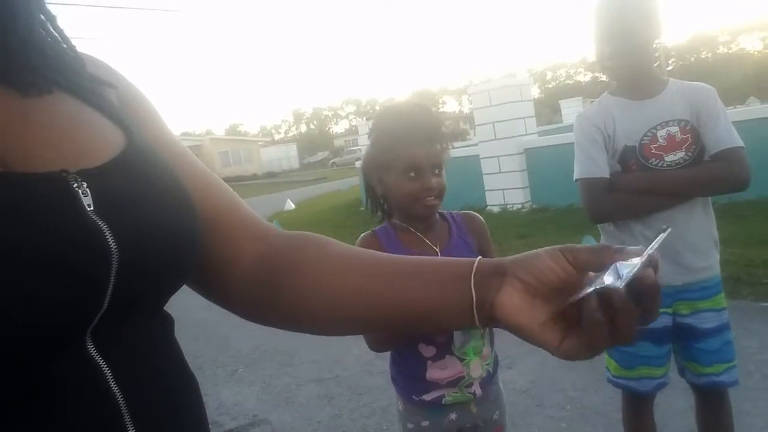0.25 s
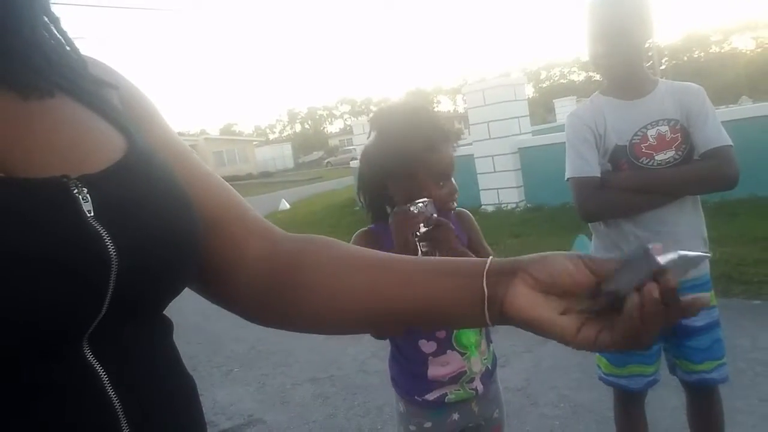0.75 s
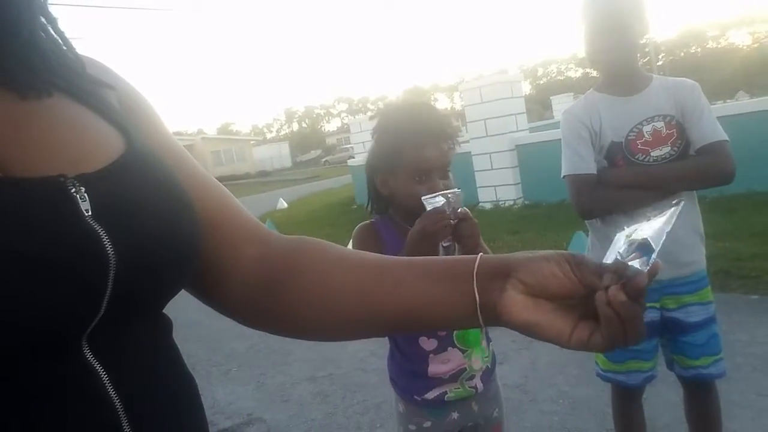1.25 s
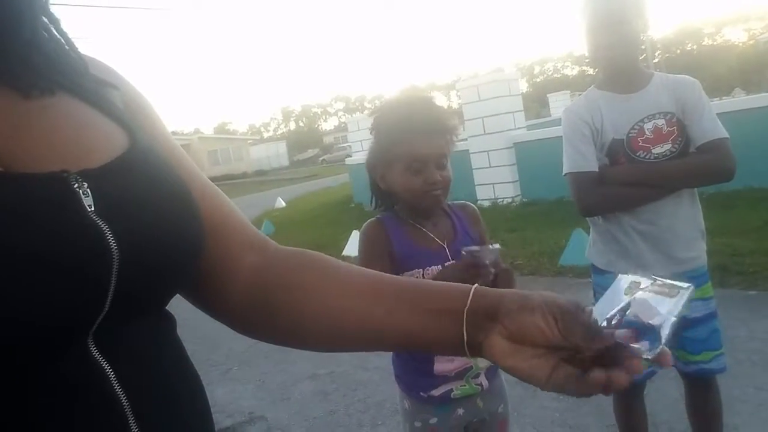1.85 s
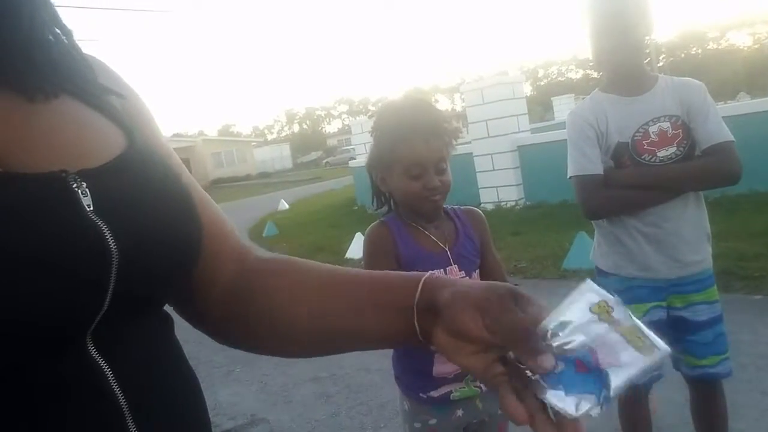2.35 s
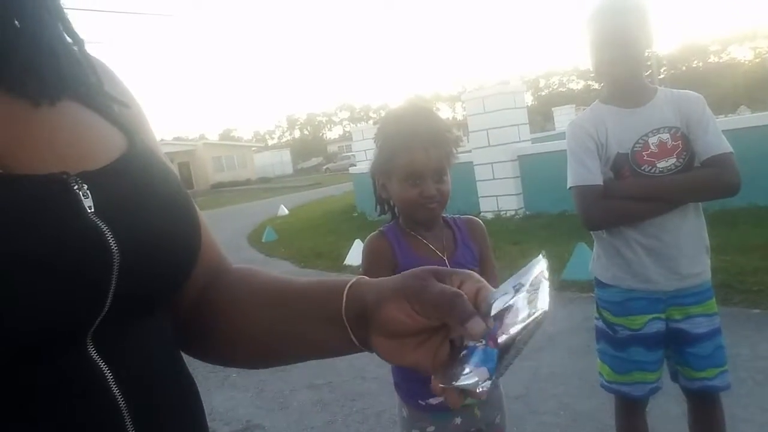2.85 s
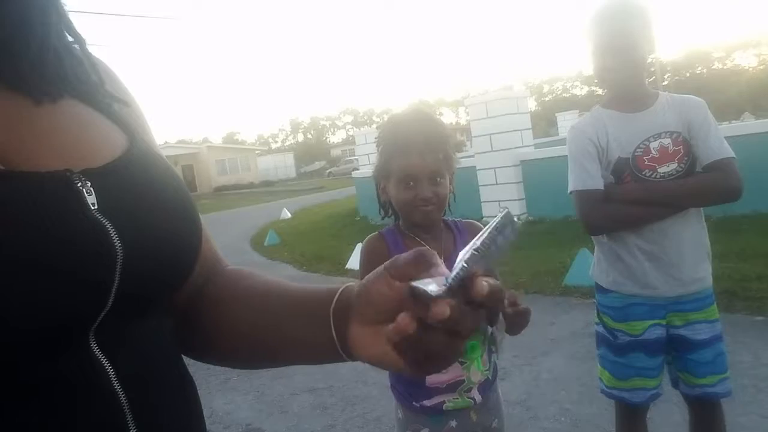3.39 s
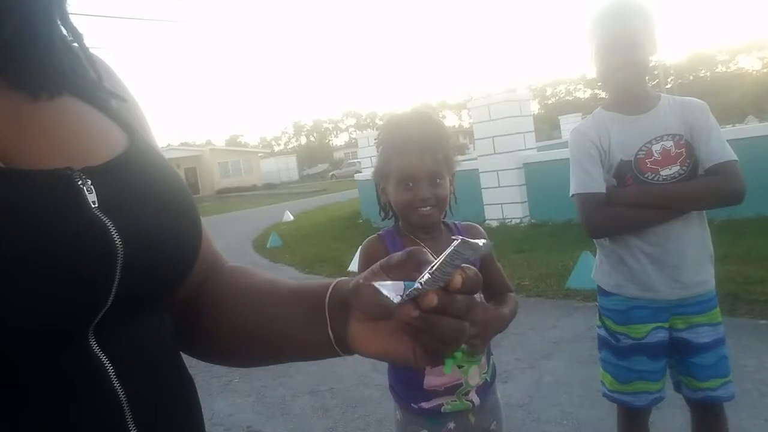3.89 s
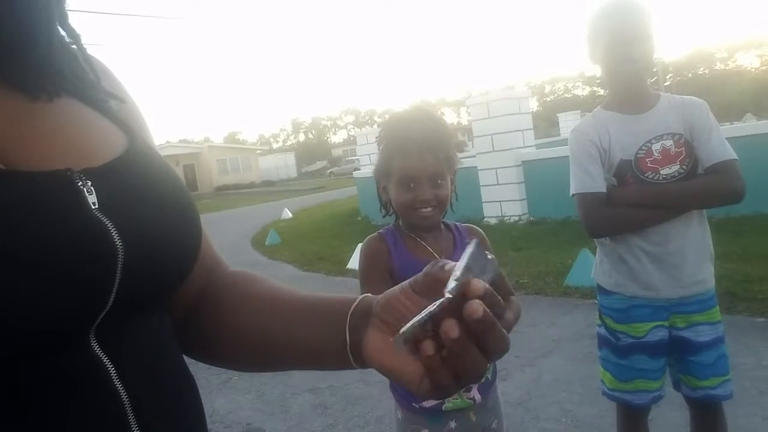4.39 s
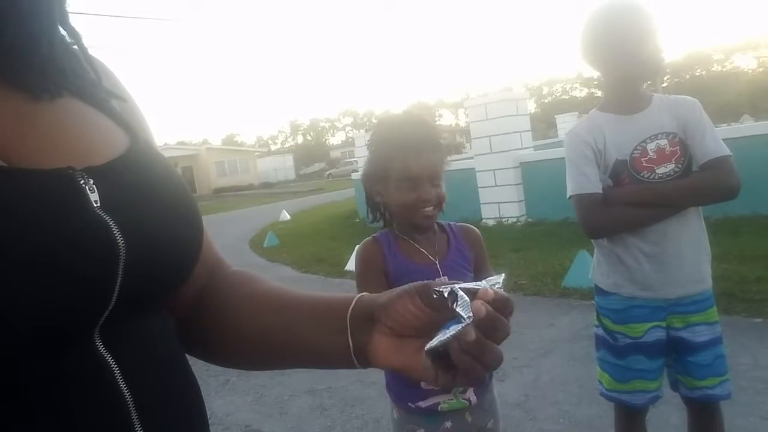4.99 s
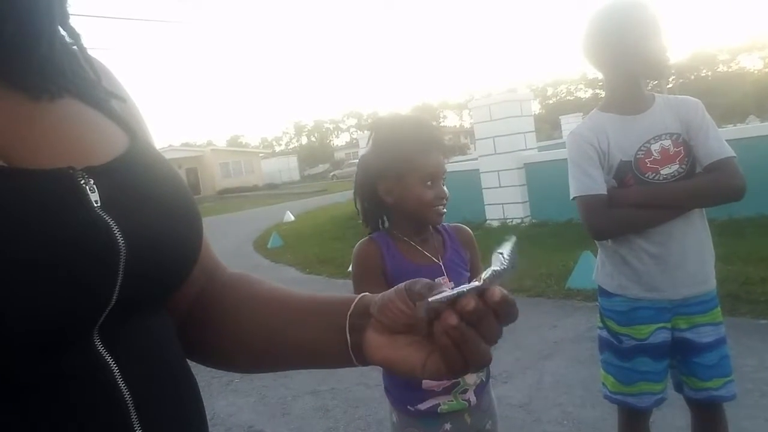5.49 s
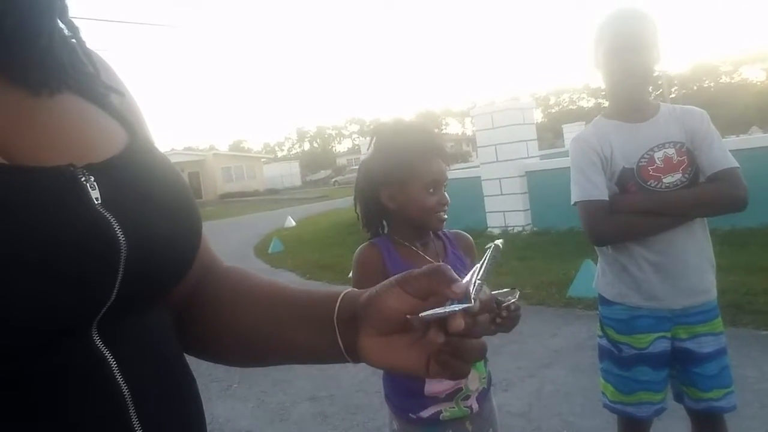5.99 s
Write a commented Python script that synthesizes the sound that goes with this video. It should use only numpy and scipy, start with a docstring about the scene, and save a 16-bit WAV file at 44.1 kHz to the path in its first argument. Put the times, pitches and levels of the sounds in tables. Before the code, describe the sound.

Small foil packets crinkle in a hand close to the microphone, slightly to the right, for about six seconds. Sharp, bright snaps come in irregular clusters, with fine rustling between them and occasional light knocks as the packet jerks. The crinkling starts lightly, grows dense and loud from about 0.4 to 1.3 seconds, then continues in shorter bursts until 2.8. It thins to soft ticks until about 3.6, then returns in busy runs around 4, 5 and 5.7 seconds, with one of the sharpest cracks near 5.8, and carries on to the end. Behind it is a quiet street with a low, distant traffic rumble and slight hiss. Two very faint, brief hoots sound far off at about 1.9 and 2.4 seconds. A barely audible engine hums from about 2.6 to 5 seconds, rising in pitch near its end.

```python
"""Sharp crinkling of small foil packets, squeezed in a hand just right of a phone on a quiet street.
Each buckling crease rings a few facets of foil, cracks in the treble and sets off its neighbours.
The packet thuds as it jerks, and countless small creases rustle between the snaps.
Behind it are distant traffic rumble, a far engine's hum, two faint hoots and microphone hiss.
The phone's body shades its left port."""
import sys
import numpy as np
from scipy import signal
from scipy.fft import rfft, irfft, next_fast_len
from scipy.io import wavfile
from scipy.ndimage import uniform_filter1d

SR = 44100
rng = np.random.default_rng(int(sys.argv[2]) if len(sys.argv) > 2 else 0)


def wrap_up_sound(samples):
    """Save the sound to the file named by the first command line argument, as 16-bit audio."""
    columns = np.atleast_2d(samples).T
    # keep every value between -1 and 1, then stretch to whole-number steps
    tamed = np.clip(columns, -1, 1)
    steps = np.round(tamed * 32767).astype(np.int16)
    wavfile.write(sys.argv[1], SR, steps)


N = 275184
GRAIN_SAMPLES = 320

# Each row: time in seconds, ring level in dB at the right port, facet pitch in Hz, crack in dB re ring.
SNAP_EVENTS = [(0.0059, -30, 1960, 8), (0.071, -20.5, 2020, -4), (0.08, -20, 2130, 4.5),
               (0.0988, -18.5, 4120, -22), (0.1224, -20, 1940, -7), (0.1301, -24.5, 2520, 5),
               (0.1353, -25, 2750, -2), (0.181, -22, 2330, 1), (0.1933, -17, 2260, -2),
               (0.2093, -18.5, 5100, 0.5), (0.265, -19, 2820, -15), (0.285, -27, 3900, -1),
               (0.334, -29, 2400, -6.5), (0.3513, -22, 3450, -16), (0.3649, -4.5, 2850, -6.5),
               (0.3686, -14, 2410, -11), (0.379, -16, 3350, -9), (0.3841, -7.5, 4130, -25),
               (0.389, -23, 2200, -10), (0.4057, -17.5, 1900, -11), (0.4091, -23, 2020, -6),
               (0.4298, -17, 1730, -12), (0.4595, -17, 1960, -17), (0.478, -24, 2500, -4),
               (0.5006, -17, 1950, -23), (0.507, -14, 1450, -1), (0.514, -6, 4360, -16),
               (0.5231, -12.5, 2040, 3.5), (0.533, -4.5, 2350, -19), (0.558, -27, 2500, 2),
               (0.563, -7, 2800, -14), (0.5667, -4.5, 2300, -7.5), (0.5755, -14, 1990, -23),
               (0.6146, -22.5, 2200, 4), (0.621, -15.5, 3720, -8), (0.6283, -16, 2120, -13),
               (0.634, -15, 3000, -16), (0.643, -18, 3140, -26), (0.6457, -15, 2930, 3),
               (0.6546, -20, 2970, 5), (0.666, -7, 3650, -9), (0.6873, -10.5, 2230, -5.5),
               (0.691, -16, 1790, -11), (0.6923, -19, 2600, -2), (0.7147, -17, 2330, -27),
               (0.7192, -18, 2110, 4), (0.723, -16, 3500, 0), (0.724, -13, 2970, -2),
               (0.7523, -5.5, 2340, -9.5), (0.757, -9.5, 2170, -14), (0.7765, -8, 2250, -16),
               (0.78, -0.5, 2830, -10.5), (0.7953, -12.5, 3070, -12), (0.813, -22, 2070, -3),
               (0.8305, -11, 3040, -6), (0.8366, -10.5, 2080, -4.5), (0.848, -17, 2980, 0),
               (0.857, -12, 3060, 2), (0.8738, -8.5, 1950, -3.5), (0.878, -24, 2040, 9),
               (0.8976, -11, 2140, -9), (0.901, -18, 2330, -21), (0.9279, -23.5, 2470, -2),
               (0.9755, -13.5, 2120, -4), (0.98, -16.5, 2100, -4), (1.0352, -18, 4440, -19),
               (1.047, -20, 2790, -7), (1.0614, -12, 2300, -5), (1.0776, -12, 4400, -8),
               (1.085, -16, 2200, -8), (1.0922, -19, 2430, -4), (1.0956, -19.5, 2200, -1),
               (1.1337, -7.5, 3460, -7), (1.1393, -10, 2680, -17), (1.1937, -22, 2690, -14),
               (1.199, -15.5, 2770, -19), (1.203, -22, 2640, -15), (1.2266, -18.5, 2280, 0),
               (1.235, -12, 3140, -27), (1.25, -15.5, 4280, -0.5), (1.2546, -10, 2260, -7.5),
               (1.2593, -13, 2280, -17), (1.2638, -16, 3580, -20), (1.2703, -22, 2930, -22),
               (1.2745, -9, 3000, -18), (1.29, -10.5, 1500, 0), (1.3207, -14.5, 2150, -14),
               (1.326, -12.5, 2920, -21), (1.3642, -22.5, 3150, -33), (1.403, -21.5, 2650, -16),
               (1.41, -25, 2480, -37), (1.4462, -19, 2810, -12.5), (1.501, -35, 2750, 6),
               (1.5128, -21.5, 2010, -5), (1.548, -21, 3400, -7), (1.553, -15, 3070, -20),
               (1.5579, -8, 3030, -2.5), (1.566, -14, 2740, -30), (1.574, -8, 3160, -11),
               (1.609, -24, 2120, 4), (1.6226, -20.5, 4470, -10), (1.6387, -18, 3160, -14),
               (1.711, -9.5, 3070, -7.5), (1.7217, -20, 3720, -16), (1.734, -25, 2730, -2),
               (1.7566, -22, 2200, -8), (1.7657, -7.5, 2900, -7), (1.773, -33, 3240, 5),
               (1.78, -16, 3190, -21), (1.7833, -27, 2990, -21), (1.7927, -12.5, 3580, -10),
               (1.9122, -18.5, 3000, -19), (1.9697, -27, 2240, 6), (1.975, -21, 3040, 10),
               (1.9937, -27, 3070, -11), (2.001, -16.5, 4200, 0), (2.0193, -6, 2300, -8.5),
               (2.0228, -13, 2420, -10), (2.07, -23.5, 4740, -8), (2.18, -16, 2400, -8),
               (2.2082, -10.5, 3160, -13), (2.2191, -12.5, 3170, -0.5), (2.2429, -10.5, 4650, -12),
               (2.255, -16.5, 3220, 0), (2.2762, -24, 4860, -7), (2.3592, -22, 2180, -19),
               (2.378, -20.5, 3050, -9), (2.393, -31, 2080, 3), (2.4292, -13, 2500, -23),
               (2.464, -16, 3530, -31), (2.4763, -14, 4900, 3), (2.497, -10.5, 2680, -30),
               (2.5112, -12.5, 1420, -18), (2.5255, -10, 3680, -13), (2.5346, -16, 3000, 1.5),
               (2.592, -28, 2020, 5.5), (2.6065, -23, 2240, -20), (2.6584, -23, 2910, -21),
               (2.6741, -12.5, 2060, -16), (2.6846, -13.5, 2560, -9), (2.717, -18, 2810, 7),
               (2.7327, -12, 2530, -8), (2.7443, -22, 4100, -19), (2.878, -28.5, 2160, 4),
               (2.966, -23.5, 3030, 1.5), (3.0659, -24.5, 2330, -4), (3.125, -27, 3260, -17),
               (3.306, -20, 1860, -19), (3.321, -24, 1740, -8), (3.3792, -28, 2710, -1.5),
               (3.4318, -28, 2480, -26), (3.461, -25, 1900, -11), (3.4755, -31.5, 4930, 0),
               (3.5009, -22.5, 2220, -7), (3.535, -29, 2250, 3), (3.562, -25.5, 2930, 4),
               (3.5894, -21, 2100, -8), (3.626, -25.5, 2350, 10), (3.6448, -21, 2780, -8),
               (3.661, -20.5, 2590, -5.5), (3.6763, -17, 2670, -7), (3.679, -18, 2000, -4),
               (3.6863, -26.5, 2580, 5), (3.702, -9.5, 2290, -8), (3.723, -16, 2340, -17),
               (3.73, -17, 2350, -13), (3.7525, -24, 2330, -21), (3.791, -17, 2320, -25),
               (3.81, -20, 2000, -13), (3.8538, -9, 2840, -10.5), (3.878, -16, 1740, -20),
               (3.889, -13.5, 2530, -9.5), (3.9084, -12.5, 2680, -11), (3.925, -18.5, 2690, -2),
               (3.931, -25, 1770, -17), (3.943, -21, 2660, -24), (3.9633, -16.5, 3330, 5),
               (3.973, -20, 3100, -13), (3.9828, -13, 2810, -2.5), (3.99, -25, 2070, -9),
               (3.9998, -5.5, 3360, -17), (4.0062, -8, 2600, -14), (4.0259, -12, 2120, -9),
               (4.0325, -13, 1900, -26), (4.043, -16, 1880, -9), (4.0468, -18, 2800, -18),
               (4.051, -11.5, 2300, -9), (4.054, -25, 2160, 0), (4.059, -17, 3990, -7),
               (4.0734, -5.5, 2700, -12), (4.086, -17, 2540, -22), (4.0954, -22, 2150, -4),
               (4.1078, -11.5, 2140, -6), (4.1431, -20.5, 2350, -33), (4.1826, -14, 2040, -16),
               (4.223, -28, 4170, 1), (4.2543, -13, 3270, -16), (4.2611, -9.5, 3250, -9.5),
               (4.2671, -9.5, 2140, -11), (4.272, -10.5, 2400, -13), (4.2814, -21, 3100, -25),
               (4.288, -24, 1940, -23), (4.295, -16, 2520, -17), (4.32, -6.5, 2670, -12),
               (4.374, -27, 2100, -14), (4.4325, -18.5, 2330, 0), (4.45, -26.5, 1770, 5),
               (4.4714, -15.5, 3060, -10), (4.5177, -22, 2440, -1.5), (4.5265, -16, 3500, -11),
               (4.5309, -13.5, 4600, -7), (4.5358, -13.5, 2560, -4.5), (4.542, -23, 2970, -8),
               (4.5545, -18.5, 1960, -24), (4.5978, -21.5, 2930, -31), (4.644, -21, 3270, -5.5),
               (4.648, -30, 2810, 4), (4.6568, -15.5, 3540, -18), (4.668, -23, 2910, -9),
               (4.673, -18.5, 2300, -8), (4.6765, -21.5, 3620, -15), (4.7911, -7, 2250, -6),
               (4.8753, -6, 3940, -7), (4.878, -6, 3730, -7), (4.9008, -11.5, 2000, -1.5),
               (4.921, -12.5, 3170, -15), (4.9242, -10.5, 2650, -8), (4.9282, -15.5, 2380, 4),
               (4.9352, -9, 2420, -8), (4.9532, -7, 2640, -4), (4.979, -4.5, 2370, -14),
               (4.988, -12, 2300, -27), (5.0096, -16, 2740, -28), (5.0273, -11.5, 3650, -0.5),
               (5.0413, -16, 1970, -29), (5.0674, -20, 4900, -5), (5.087, -32, 1810, 5),
               (5.111, -24, 1730, -2), (5.1472, -5.5, 2280, -16.5), (5.162, -19, 2140, -5),
               (5.188, -16.5, 2290, 0), (5.194, -19, 2530, -2), (5.2, -20, 2530, -21),
               (5.231, -13.5, 2400, 3), (5.2507, -24, 3000, 1), (5.253, -12.5, 2900, -8),
               (5.2623, -6.5, 2580, -5), (5.2663, -11.5, 2370, 2), (5.281, -11.5, 4100, -18),
               (5.3105, -15, 1500, -17), (5.342, -19.5, 2160, -10), (5.3561, -20, 1800, 4),
               (5.413, -20, 1710, -2.5), (5.434, -18, 3270, -10), (5.436, -18, 2690, -21),
               (5.438, -24.5, 2800, 4), (5.46, -22.5, 2960, -24), (5.5691, -8, 3000, -18),
               (5.5875, -25, 2390, -20), (5.606, -7.5, 2740, -6), (5.6305, -20, 1940, -21),
               (5.662, -19.5, 2300, -6.5), (5.687, -16.5, 3430, -5.5), (5.6902, -21, 2290, -11),
               (5.701, -25, 2140, 1), (5.7086, -4.5, 2490, -12), (5.7173, -13.5, 2070, -8),
               (5.7214, -11, 1950, -5), (5.726, -16, 3700, -15), (5.75, -13.5, 2800, -0.5),
               (5.777, -29, 3200, -13), (5.7944, 0.5, 2970, -15), (5.8016, -13, 3020, -7),
               (5.8094, -11.5, 2420, -2), (5.837, -20, 2900, -1.5), (5.9004, -25, 2030, -4),
               (5.924, -15.5, 4370, 0), (5.9487, -9, 3120, -24), (5.955, -22, 3150, -7),
               (5.959, -8.5, 2530, -2.5), (5.9658, -14, 2240, -9), (6.015, -17, 4940, -2),
               (6.0254, -16, 2320, -19), (6.0747, -29, 2030, 2), (6.131, -12, 3150, -10.5),
               (6.157, -16.5, 1620, -2), (6.16, -23, 1680, -10), (6.168, -13.5, 2370, -19),
               (6.1766, -14, 4300, -18), (6.1859, -27, 2400, 7), (6.199, -18, 4050, -9),
               (6.202, -10.5, 3200, -33), (6.21, -25, 2780, 0), (6.2139, -9, 2960, -6),
               (6.2214, -23, 2390, -6)]

def snaps(neighbours=3):
    """Loud creases buckle, each with faint neighbours just before or after it."""
    s, ring_db, hz, crack_db = np.transpose(SNAP_EVENTS)
    main = creases(s, ring_db, hz, crack_db, cycles=1.7, crack_s=0.00092, thud_db=-35, tick_db=4)
    s, ring_db, hz, crack_db = np.repeat(SNAP_EVENTS, neighbours, axis=0).T
    chance = rng.random((len(s), 3))
    apart_s = 0.0065 * (chance[:, 0] - .22)
    ring_db = ring_db - 13 - 1400 * np.abs(apart_s) - 9 * chance[:, 1]
    hz = hz * 2 ** (1.6 * (chance[:, 2] - .5))
    return main + creases(s + apart_s, ring_db, hz, crack_db + 4,
                          cycles=2, crack_s=0.0008, thud_db=-36, tick_db=-10)


# Spectra of the crack at each port and of a crease's thud. Each row: frequency in Hz, relative gain in dB.
CRACK_RIGHT_EQ = [(3500, -2), (4800, 1.5), (6000, -5.5), (8000, 0.5), (10300, -9), (12000, -7),
                  (13500, -6.5), (15600, 1.5), (16300, -22)]
CRACK_LEFT_EQ = [(3500, 1.5), (4800, 2), (6000, 0.5), (8500, -0.5), (12000, 5), (15400, -1.5), (16300, -29)]
THUD_EQ = [(120, -7), (280, -1.5), (600, 1.5), (1000, 2.5), (1600, 4), (4000, -63)]
# Shading by the phone's body. Each row: frequency in Hz, left minus right in dB.
BODY_SHADE = [(700, 25), (1300, -13.5), (2400, -14.5), (4400, -7)]
# Each row: time in seconds, lead of the left port in samples.
PORT_LEAD = [(0, 9.2), (2.5, 9.4), (3.5, 5.1), (6.24, 4.9)]

def creases(s, ring_db, hz, crack_db, cycles, crack_s, thud_db, tick_db):
    """A buckling crease rings three facets, cracks in the treble and thuds faintly, at both ports."""
    chance = rng.random((len(s), 10))
    noise = rng.standard_normal((3, len(s), GRAIN_SAMPLES))  # right crack, left crack, thud
    tilt = 0.41 * (chance[:, 9, None] - .5)  # duller or brighter
    noise[:, :, 1:] += tilt * noise[:, :, :-1]
    # many edges crack at once, so the ports share only part of the noise
    noise[1] = .45 * np.roll(noise[0], -6, axis=1) + .89 * noise[1]
    start = np.round(s * SR).astype(int) - GRAIN_SAMPLES // 3
    lead_samples = along(PORT_LEAD, s)[0] + 5 * (chance[:, 0] - .5)
    facing_db = 5 * (chance[:, 1] - .5)  # each facet faces its own way
    ports = []
    for left, crack_eq in ((1, CRACK_LEFT_EQ), (0, CRACK_RIGHT_EQ)):
        t = (np.arange(GRAIN_SAMPLES) - GRAIN_SAMPLES // 3 + left * lead_samples[:, None]) / SR
        ring = 0
        for k, share in enumerate((1, .45, .4)):
            facet_hz = hz if k == 0 else np.sqrt(2900 * hz) * 2 ** (2.12 * (chance[:, 2 + k] - .42))
            gain = share * undb(ring_db + left * (along(BODY_SHADE, facet_hz)[0] + facing_db))
            offset = chance[:, 5 + k, None]
            delay_s = 0.002322 * (offset - .45) * (k > 0)
            turns = facet_hz[:, None] * (t - delay_s)
            wave = np.cos(2 * np.pi * (turns + offset))
            ring = ring + gain[:, None] * swell(turns, 0.75, cycles) * wave
        crack_gain = undb(ring_db + crack_db + left * (facing_db - 7))
        envelope = swell(t, 0.0002, crack_s * (.5 + chance[:, 8, None]))
        crack = envelope * noise[left]
        crack *= (crack_gain * np.linalg.norm(envelope, axis=1) / np.linalg.norm(crack, axis=1))[:, None]
        # the first tear is the brightest
        tick = swell(t, 0.00008, 0.0001) * np.diff(noise[left], 2, axis=1, prepend=0, append=0)
        tick_gain = crack_gain * undb(tick_db) * (.3 + .7 * chance[:, 2])
        crack += tick_gain[:, None] * tick
        thud = undb(ring_db + thud_db - 0.85 * left)[:, None] * swell(t, 0.00044, 0.00076) * noise[2]
        sheet = scatter(start, ring) + colour(scatter(start, crack), crack_eq)
        sheet = highpass(sheet, hz=1450, order=2)  # a small sheet radiates little bass
        ports.append(sheet + colour(scatter(start, thud), THUD_EQ))
    return np.array(ports)


# Finger pushes. Each row: start in seconds, hold in seconds, ring level in dB, crack level in dB.
FINGER_PUSHES = [(0.0, 0.02, -44, -68), (0.057, 0.045, -42, -68), (0.124, 0.018, -37, -58),
                 (0.181, 0.026, -36.5, -52), (0.243, 0.071, -36, -50.5), (0.349, 0.048, -33.5, -48),
                 (0.44, 0.023, -35.5, -57), (0.489, 0.054, -29.5, -45.5), (0.617, 0.035, -33.5, -59),
                 (0.816, 0.085, -35.5, -51), (0.956, 0.027, -35.5, -49), (1.01, 0.073, -35.5, -53.5),
                 (1.23, 0.067, -43, -57), (1.544, 0.012, -35.5, -65), (1.603, 0.037, -50, -69),
                 (1.674, 0.041, -48, -61), (1.758, 0.1, -47.5, -63), (1.966, 0.13, -42, -56.5),
                 (2.105, 0.19, -44.5, -57.5), (2.341, 0.046, -38.5, -60), (2.42, 0.04, -38, -61),
                 (2.507, 0.027, -32.5, -52), (2.578, 0.026, -41, -49), (2.64, 0.038, -38, -53.5),
                 (2.714, 0.036, -36.5, -52), (2.815, 0.051, -48.5, -64.5), (2.948, 0.021, -45, -60),
                 (3.003, 0.14, -48, -63.5), (3.266, 0.053, -42.5, -56), (3.381, 0.04, -41.5, -59.5),
                 (3.496, 0.091, -43.5, -62.5), (3.611, 0.3, -42.5, -60.5), (3.922, 0.164, -37.5, -52.5),
                 (4.224, 0.057, -41, -57), (4.365, 0.042, -40, -57.5), (4.466, 0.11, -37.5, -61),
                 (4.626, 0.061, -42, -69), (4.751, 0.0089, -43, -67), (4.875, 0.056, -59, -57),
                 (5.064, 0.029, -33, -47.5), (5.151, 0.13, -41, -52.5), (5.215, 0.12, -39.5, -56),
                 (5.37, 0.12, -44.5, -67), (5.545, 0.12, -40, -62), (5.695, 0.021, -57, -49),
                 (5.779, 0.023, -57, -63), (5.913, 0.053, -39.5, -53.5), (6.008, 0.13, -41.5, -59),
                 (6.161, 0.06, -37, -48)]

def rustle(count=7500):
    """Small creases buckle densely, mostly faint, following the fingers and the snaps."""
    chance = rng.random((count, 4))
    s = chance[:, 0] * N / SR
    _, _, push_db, push_crack_db = np.transpose(FINGER_PUSHES)
    _, snap_db, _, snap_crack_db = np.transpose(SNAP_EVENTS)
    body_db = stir_db(s, push_db, snap_db - 35, rest_db=-63.5)
    treble_db = stir_db(s, push_crack_db, snap_db + snap_crack_db - 44, rest_db=-76.5)
    ring_db = body_db + np.minimum(-3.6 * np.log(1 - chance[:, 1]), 12)
    hz = 2500 * 2 ** (chance[:, 2] - .45)
    crack_db = treble_db - body_db + 25.4 * (chance[:, 3] - .45)
    return creases(s, ring_db, hz, crack_db, cycles=1.68, crack_s=0.0023, thud_db=-17.5, tick_db=-8)


def stir_db(s, push_db, snap_db, rest_db):
    """Rustle level: the packet at rest, finger pushes and unrest around each snap, added as power."""
    push_rise_s, push_fall_s = 0.0043, 0.0077
    snap_rise_s, snap_fall_s = 0.007, 0.022
    start_s, hold_s = np.transpose(FINGER_PUSHES)[:2]
    age_s = s[:, None] - start_s
    pushed = np.exp(np.minimum(age_s, 0) / push_rise_s - np.maximum(age_s - hold_s, 0) / push_fall_s)
    age_s = s[:, None] - np.transpose(SNAP_EVENTS)[0]
    unrest = np.exp(np.where(age_s < 0, age_s / snap_rise_s, -age_s / snap_fall_s))
    return 10 * np.log10(undb(2 * rest_db) + pushed @ undb(2 * push_db) + unrest @ undb(2 * snap_db))


# Each row: time in seconds, level in dB, pitch in Hz.
PACKET_JERKS = [(0.365, -36.5, 765), (0.509, -45, 805), (0.522, -51, 930), (0.688, -21.5, 1020),
                (0.833, -26.5, 990), (0.899, -35, 845), (0.975, -31.5, 870), (1.255, -34, 690),
                (1.97, -32.5, 834), (2.019, -33, 290), (2.527, -38, 450), (3.999, -21, 1130),
                (4.108, -33.5, 560), (4.323, -28, 804), (4.537, -38, 372), (4.954, -38, 750),
                (4.976, -33, 670), (5.088, -37, 550), (5.269, -42, 400), (5.794, -19.5, 1230),
                (5.795, -32, 473)]

def thuds():
    """The whole packet jerks: low knocks with an overtone, whose long waves bend round the phone."""
    s, level_db, hz = np.transpose(PACKET_JERKS)
    t = (np.arange(4 * GRAIN_SAMPLES) - GRAIN_SAMPLES) / SR
    turns = hz[:, None] * t
    overtone = np.sin(2 * np.pi * (2.3 * turns + rng.random((len(s), 1))))
    wave = np.sin(2 * np.pi * turns) + 0.65 * overtone
    grains = undb(level_db + 0.5)[:, None] * swell(turns, 0.68, 1.08) * wave
    knocks = scatter(np.round(s * SR).astype(int) - GRAIN_SAMPLES, grains)
    return np.array([undb(-3) * knocks, knocks])


# Traffic in the bass, microphone hiss in the treble. Each row: frequency in Hz, relative gain in dB.
STREET_AND_MIC_HISS_EQ = [(18, -31), (30, 1.5), (118, 8), (330, -6.5), (800, -5.5), (1500, -15),
                          (2900, -31), (10000, -60), (15600, -13), (16100, -55)]
# Each row: time in seconds, level in dB.
BACKGROUND_LEVEL = [(0.0, -51.5), (0.9, -51), (1.6, -55), (2.6, -52.5), (3.2, -58.5), (3.91, -53.5),
                    (6.24, -51)]

def street_and_mic_hiss():
    """Distant traffic rumble, nearly the same at both ports, plus each microphone's own hiss."""
    mid, side = colour(rng.standard_normal((2, N)), STREET_AND_MIC_HISS_EQ)
    side = undb(-16) * side + highpass(side, hz=1300, order=1)
    gain = undb(along(BACKGROUND_LEVEL, np.arange(N) / SR)[0])
    return gain * np.array([undb(-1.2) * (mid + side), mid - side])


# Each row: time in seconds, pitch in Hz, RMS level in dB.
ENGINE_TRACK = [(2.55, 177, -70), (2.7, 176.8, -68), (3.5, 173.2, -64.5), (4.2, 179.5, -62.5),
                (4.45, 212, -66), (4.8, 231, -59.5), (4.95, 229.7, -86)]

def engine(waver_samples=2000):
    """A far engine gathers speed, its hum wavering in level and pitch."""
    t = np.arange(N) / SR
    hz, rms_db = along(ENGINE_TRACK, t)
    steps = np.repeat(rng.standard_normal((2, N // waver_samples + 1)), waver_samples, axis=1)
    level_waver, pitch_waver = uniform_filter1d(steps, size=waver_samples)[:, :N]
    turns = np.cumsum(hz * (1 + 0.0227 * pitch_waver)) / SR
    on = (t > ENGINE_TRACK[0][0]) & (t < ENGINE_TRACK[-1][0])
    return np.sqrt(2) * on * undb(rms_db + 2 * level_waver) * np.sin(2 * np.pi * turns)


# Each row: start in seconds, length in seconds, starting pitch in Hz, top RMS level in dB.
HOOT_EVENTS = [(1.855, 0.028, 780, -53), (2.4, 0.092, 857, -55)]

def hoots(pitch_rise=0.06):
    """Short, faint far tones that climb slightly."""
    t = np.arange(N) / SR
    out = np.zeros(N)
    for start_s, length_s, hz, rms_db in HOOT_EVENTS:
        progress = np.clip((t - start_s) / length_s, 0, 1)
        turns = hz * length_s * progress * (1 + pitch_rise * progress / 2)
        out += undb(rms_db) * np.sin(np.pi * progress) ** .5 * np.sin(2 * np.pi * turns)
    return np.sqrt(2) * out


def undb(db):
    """Decibels to gain."""
    return 10 ** (np.asarray(db) / 20)


def along(table, at):
    """Interpolate a table's other columns along its first."""
    axis, *columns = np.transpose(table)
    return [np.interp(at, axis, column) for column in columns]


def colour(x, eq):
    """Shape the spectrum by (Hz, dB) points; white noise keeps its power."""
    hz, db = np.transpose(eq)
    size = next_fast_len(N)
    bin_hz = np.arange(size // 2 + 1) * SR / size
    gain = undb(np.interp(np.log(bin_hz + 1), np.log(hz), db))
    return irfft(rfft(x, size) * gain / np.sqrt(np.mean(gain ** 2)), size)[..., :N]


def highpass(x, hz, order):
    """Roll off below hz."""
    return signal.sosfilt(signal.butter(order, hz, "high", fs=SR, output="sos"), x)


def scatter(start, grains):
    """Add each grain to the time line from its start sample."""
    place = np.clip(start[:, None] + np.arange(grains.shape[1]), 0, N)
    return np.bincount(place.ravel(), grains.ravel(), N + 1)[:N]


def swell(t, rise, fall):
    """Bell-shaped rise to t = 0, then exponential fall; both in the unit of t."""
    return np.exp(np.where(t < 0, -(t / rise) ** 2, -t / fall))


def scene():
    """Foil in the hand over the street, as left and right."""
    return snaps() + rustle() + thuds() + street_and_mic_hiss() + engine() + hoots()


def record(dry):
    """The loudest peaks are rounded softly, and the phone cuts the top."""
    ceiling, top_hz = 0.9, 16600
    rounded = dry / (1 + (dry / ceiling) ** 4) ** .25
    return signal.sosfilt(signal.ellip(12, .2, 90, top_hz, fs=SR, output="sos"), rounded)


dry = scene()
out = record(dry)
wrap_up_sound(out)
```